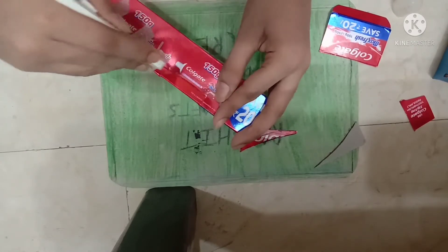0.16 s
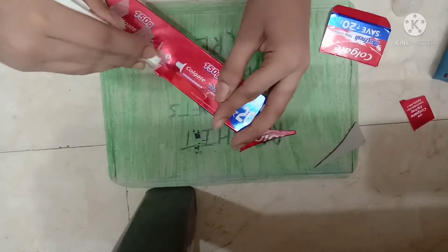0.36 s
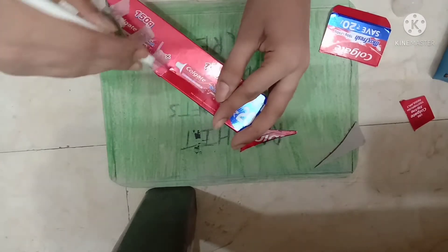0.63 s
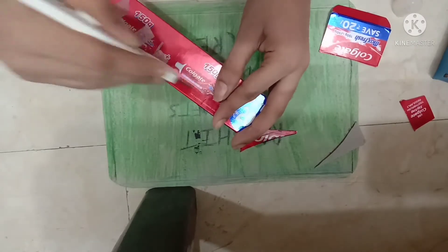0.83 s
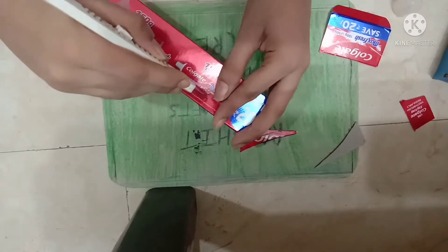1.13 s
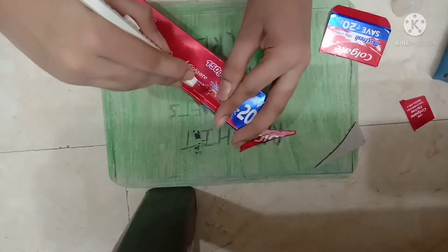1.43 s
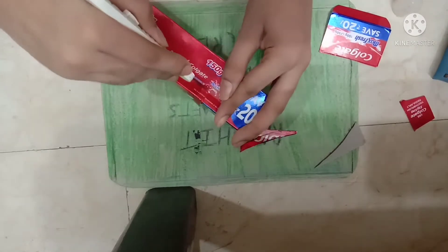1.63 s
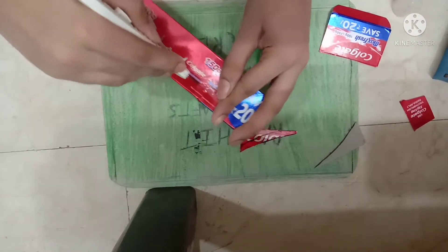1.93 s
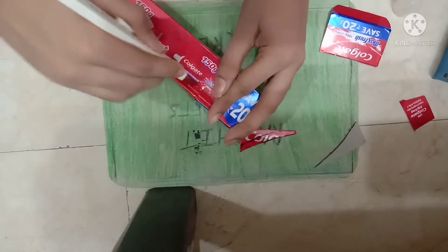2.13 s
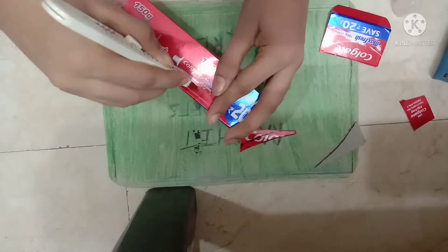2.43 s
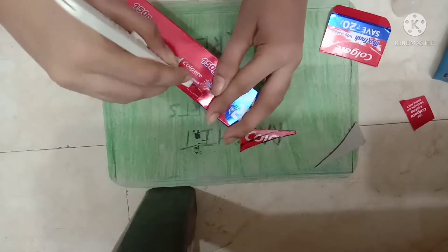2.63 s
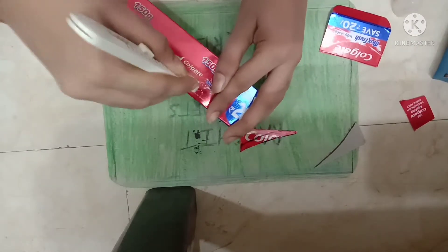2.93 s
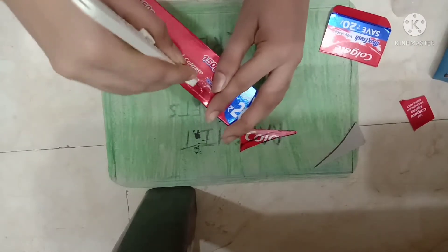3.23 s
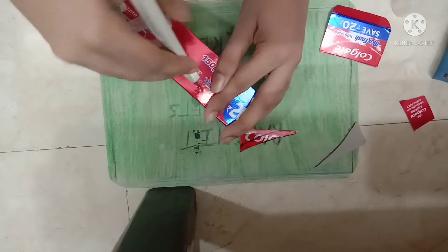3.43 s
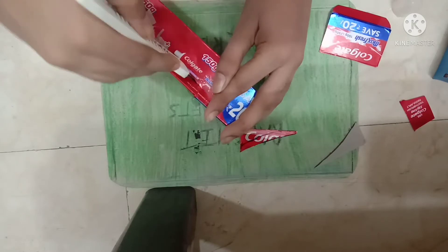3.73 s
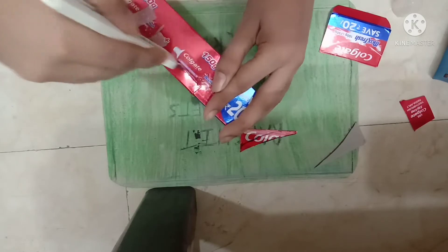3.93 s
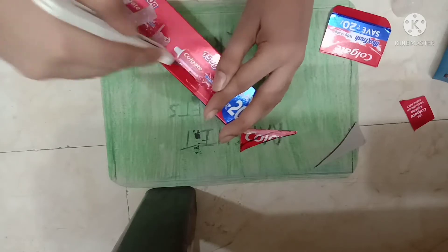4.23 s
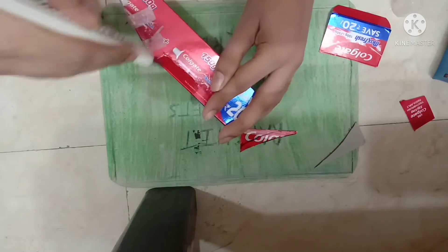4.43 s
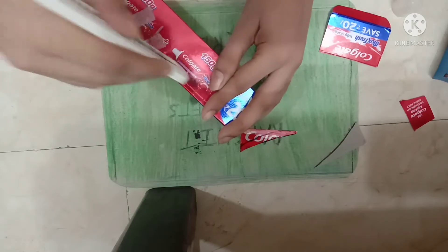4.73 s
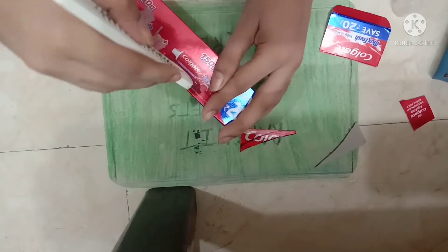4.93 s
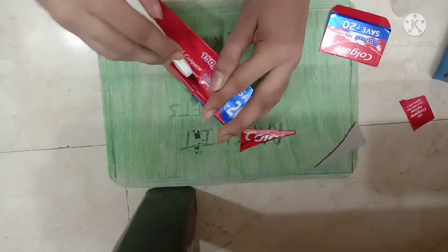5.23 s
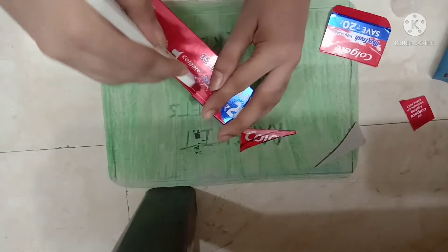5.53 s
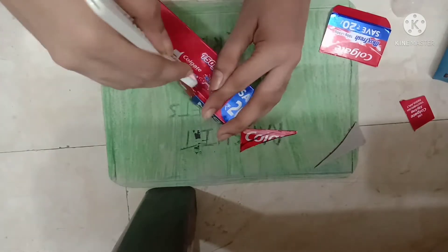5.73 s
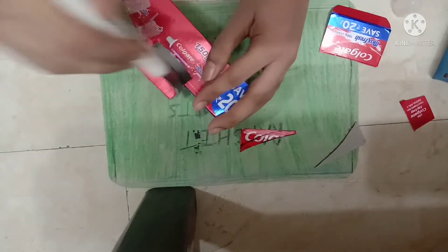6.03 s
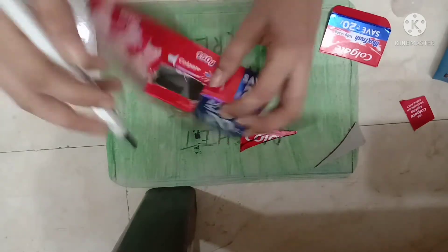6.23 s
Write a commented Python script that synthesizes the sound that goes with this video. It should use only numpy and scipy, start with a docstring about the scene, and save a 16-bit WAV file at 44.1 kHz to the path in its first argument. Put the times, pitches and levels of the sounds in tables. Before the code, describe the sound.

A blade nicks and scrapes through thin cardboard in short crackly bursts with hollow box knocks, over steady fan air and lumpy low microphone buffeting.

```python
"""Cutting a cardboard box

A snap-off blade scores and cuts a thin cardboard box in a small hard room, heard through a phone.
Fibres tear in short noise crackles and longer scrapes that drum the panels; jolts ring the box, the blade pings.
Hands rub the card. Filtered noise gives fan air; low noise and short pulses buffet the microphone."""
import sys
import numpy as np
from scipy import signal
from scipy.fft import rfft, irfft, next_fast_len
from scipy.io import wavfile
from scipy.ndimage import uniform_filter1d

SR = 44100
rng = np.random.default_rng(int(sys.argv[2]) if len(sys.argv) > 2 else 0)


def persist_wave(psi):
    """Save psi, clipped to +-1, as 16-bit WAV."""
    counts = np.round(np.clip(psi, -1, 1) * 32767).astype(np.int16)
    wavfile.write(sys.argv[1], SR, np.atleast_2d(counts).T)


N = 280917  # samples

# Blade nicks: start_s, crackle_db, crackle_centre_hz, broad_hiss_re_crackle_db
BLADE_NICKS = [(0.483, -27, 5200, -9), (0.879, -30, 5760, -9.5), (1.429, -32, 5600, -7),
               (1.473, -17, 6100, -3.5), (1.5134, -21.5, 4300, -11), (1.528, -21.5, 3040, -13),
               (1.9729, -19, 3730, -14), (1.9792, -12, 3800, -10.5), (2.0016, -12, 3950, -9),
               (2.2113, -29.5, 6860, -10), (2.6035, -18.5, 5700, -3.5), (2.647, -24, 3700, -6),
               (2.8058, -22, 6900, -9.5), (3.094, -30, 6160, -9.5), (3.202, -36.5, 6100, -4.5),
               (3.344, -38, 5340, -4), (3.352, -25.5, 6460, -2), (3.4027, -25, 3140, -12),
               (3.4513, -32, 3550, -9), (3.689, -36, 5490, -8), (3.757, -26, 3560, -8),
               (3.897, -24, 3570, -11), (3.909, -16.5, 3570, -12.5), (3.955, -21, 3140, -9),
               (4.0372, -40, 5740, -9), (4.079, -26, 2990, -8), (4.1, -17.5, 2980, -8.5),
               (4.1128, -24, 4900, -9), (4.1345, -19.5, 3950, -5.5), (4.148, -22.5, 6200, -11),
               (4.1677, -21, 4960, -5), (4.1884, -20.5, 3130, -10), (4.1988, -25, 6940, -10),
               (4.251, -19.5, 7100, -9.5), (4.2667, -25, 6100, -5), (4.6353, -22, 7600, -8),
               (5.0214, -28, 5800, -7), (5.0433, -19, 3730, -9), (5.0821, -19, 4460, -4.5),
               (5.3464, -13.5, 5990, -7.5), (5.578, -29.5, 4850, -10), (5.6187, -18.5, 4900, -7),
               (5.6225, -15.5, 5420, -5.5), (5.679, -26.5, 7520, -6), (5.7088, -32, 5900, -12),
               (5.7914, -32, 3050, -7), (5.8154, -16, 5360, -9.5), (5.824, -26, 7700, -3),
               (5.9493, -37, 5800, -5), (6.0573, -24.5, 5000, -13), (6.074, -31, 3870, -12),
               (6.1409, -32, 7060, -8), (6.21, -26, 4950, -8), (6.222, -26, 3840, -7),
               (6.238, -16.5, 2680, -4), (6.2427, -18.5, 6060, -7), (6.343, -25, 5890, -12)]
NICK_S = .0052  # time constant of the burst's bell-shaped decay


def nicks():
    """Each nick opens with a snap in a quick burst of tearing fibres: resonant crackle plus hiss."""
    snaps = fibres(1.55, 2.1)
    crackle = np.zeros(N)
    t = np.arange(4096) / SR
    envelope = np.minimum(t / 0.0017, 1) * np.exp(-(t / NICK_S) ** 2)
    thin = signal.butter(2, 2400, "high", fs=SR, output="sos")
    for start_s, crackle_db, centre_hz, hiss_db in BLADE_NICKS:
        i = int(start_s * SR)
        burst = envelope[:N - i] * snaps[i:i + len(t)]
        burst[8] += 0.6  # opening snap
        burst *= undb(crackle_db) * np.sqrt(NICK_S * SR / np.sum(burst ** 2))  # set burst energy
        hiss = undb(hiss_db) * signal.sosfilt(thin, burst)
        crackle[i:i + len(t)] += hiss + resonate(burst, centre_hz, 0.096 * centre_hz)
    return crackle


# Blade strokes: start_s, pressure_turn_s (may fall just outside the stroke), end_s,
# tearing_db, drumming_db, brightness_db_per_octave
BLADE_STROKES = [(1.462, 1.474, 1.54, -33.5, -34.5, -5.5), (1.964, 1.993, 2.038, -26.5, -21, -2.5),
                 (2.165, 2.22, 2.39, -48.5, -41.5, -2), (2.603, 2.613, 2.74, -36.5, -38, 3.5),
                 (3.359, 3.35, 3.45, -38, -44, -5), (3.682, 3.805, 3.78, -40, -39.5, -0.5),
                 (3.899, 3.943, 3.96, -26, -20, -1), (4.054, 4.119, 4.24, -34.5, -24.5, -1),
                 (4.25, 4.273, 4.31, -40.5, -37, 1), (5.014, 5.045, 5.14, -34.5, -31.5, -2),
                 (5.076, 5.088, 5.154, -32.5, -33, 2), (5.286, 5.344, 5.42, -43.5, -37, 3.5),
                 (5.631, 5.628, 5.76, -30, -29, 3), (5.804, 5.832, 5.88, -32.5, -38.5, 0),
                 (6.037, 6.076, 6.15, -41, -52, -3), (6.13, 6.153, 6.2, -40.5, -54, -3.5),
                 (6.235, 6.244, 6.26, -22.5, -31.5, 3)]
# Box panel resonances: centre_hz, width_hz, level_db
BOX_PANELS = [(322, 250, -3), (506, 57, 2), (735, 99, -6), (845.5, 65, 2.5), (980, 134, -2.5),
              (1264, 41, 1.5), (1550, 270, -11)]
BITE_DB, EASE_DB = 10.5, 23.5  # pressure at the start and end points, below that at the turn


def strokes():
    """The edge ploughs through card: a rough tear, with stick-slip shudder driving the panels."""
    t = np.arange(N) / SR
    tear, drum, bright_db = np.zeros(N), np.zeros(N), np.zeros(N)
    for start_s, pressure_turn_s, end_s, tear_db, drum_db, tilt_db in BLADE_STROKES:
        fade = np.clip(np.minimum(t - start_s, end_s - t) / 0.0031, 0, 1)
        pressure_db = np.interp(t, [start_s, pressure_turn_s, end_s], [-BITE_DB, 0, -EASE_DB])
        pressure = fade * undb(pressure_db)
        tear += undb(tear_db) * pressure
        drum += undb(drum_db) * pressure
        bright_db[fade > 0] = tilt_db
    slips = undb(2.6 * walk(120))  # the edge catches and lets go
    torn = crunch(tear * slips, 3.8, 60, bright_db)
    torn = colour(torn, [(2000, 0.5), (7000, -1.0), (10000, -1.5), (16000, -0.5)])
    drummed = ring(drum * slips * fibres(2.55, 1.5), BOX_PANELS)
    return torn + drummed


# Jolts into the box: start_s, peak_db, struck_panel_hz
BOX_JOLTS = [(1.471, -18.5, 770), (1.513, -29, 853), (1.988, -12.5, 790), (2.0, -34, 860),
             (2.005, -17, 770), (3.402, -26, 590), (3.757, -20, 770), (3.807, -27, 810), (3.902, -14, 845),
             (3.932, -16, 519), (4.088, -13.5, 775), (4.102, -12, 810), (4.112, -12, 875),
             (4.119, -12, 487), (4.135, -12.5, 1260), (4.149, -11.5, 420), (4.166, -14, 534),
             (4.189, -17.5, 500), (4.2, -15, 517), (4.25, -17, 786), (4.269, -21.5, 519), (5.039, -28, 990),
             (5.079, -14, 460), (5.083, -35, 506), (5.349, -23.5, 1270), (5.619, -8.5, 760),
             (5.674, -17, 580), (5.683, -22.5, 1140), (5.795, -26, 1110), (5.822, -11.5, 1260),
             (5.831, -19, 1250), (6.24, -24, 940)]


def knocks():
    """A short push rings the panels, most of all those tuned near the place it lands."""
    out, push = np.zeros(N), np.zeros(8192)
    push[:14] = np.hanning(14)
    for start_s, peak_db, near_hz in BOX_JOLTS:
        i = int(start_s * SR)
        knock = ring(push, near(BOX_PANELS, near_hz, fall_db_per_octave=13.0))[:N - i]
        out[i:i + len(push)] += undb(peak_db) * knock / np.max(np.abs(knock))
    return out


# Blade pings: start_s, level_db, pitch_hz, t60_s
BLADE_PINGS = [(5.678, -42, 7830, 0.073), (5.825, -33, 7520, 0.08), (6.241, -29.5, 5880, 0.06),
               (6.342, -39, 5800, 0.07)]


def pings():
    """The blade, flicked free, rings as a decaying sine of unsteady level."""
    out, t = np.zeros(N), np.arange(N) / SR
    for start_s, level_db, pitch_hz, t60_s in BLADE_PINGS:
        age_s = np.maximum(t - start_s, 0)
        decay = undb(level_db - 60 * age_s / t60_s)
        out += decay * np.sin(2 * np.pi * pitch_hz * age_s)
    return out * undb(1.3 * walk(200))


# Hands rubbing card: time_s, level_db
HAND_RUSTLE = [(0, -57), (2.2, -55.5), (3.15, -59), (3.3, -57), (3.75, -53.5), (4.4, -58.5), (5.0, -61),
               (5.3, -51.5), (5.6, -58), (5.77, -51), (5.92, -57.5), (6.1, -50.5), (6.37, -53)]


def rustle():
    """Hands rub the card faintly: flickering noise, strongest near 3 kHz."""
    time_s, level_db = np.transpose(HAND_RUSTLE)
    rub = crunch(1, 3.7, 8)
    rub = colour(rub, [(2000, -0.5), (3000, 7.5), (5000, -2.0), (7500, 2.0), (16000, -9.0)])
    return undb(np.interp(np.arange(N) / SR, time_s, level_db)) * unit(rub)


ROOM_T60_S, ROOM_DB = 0.23, -7


def room(x):
    """Dense random reflections with an exponential decay, the treble slightly weaker."""
    t = np.arange(int(.6 * SR)) / SR
    decay = np.exp(-np.log(1000) * t / ROOM_T60_S)
    tail = rng.standard_normal(len(t)) * decay * np.minimum(t / 0.0081, 1)
    tail = colour(tail, [(300, -0.27), (3000, 0.41), (16000, -1.7)])
    return signal.fftconvolve(x, undb(ROOM_DB) * tail / np.sqrt(np.sum(tail ** 2)))[:N]


# Hard eddies: crest_s, level_db, pitch_hz, length_cycles
HARD_EDDIES = [(0.076, -15.0, 110, 1.1), (0.174, -16.0, 101, 2.4), (0.213, -25, 108, 1.7),
               (0.243, -20, 104, 1.2), (0.311, -22.5, 102, 2.6), (0.373, -28, 95, 1.4),
               (0.406, -19, 150, 0.67), (0.42, -23, 119, 1.5), (0.463, -31, 93, 0.8),
               (0.607, -14.5, 122, 1.86), (0.71, -15.5, 143, 1.14), (0.737, -20, 100, 1.4),
               (0.76, -28, 98, 1.5), (0.913, -30.5, 112, 3.4), (1.88, -21.5, 115, 1.3),
               (1.998, -13.5, 131, 0.69), (2.047, -22.5, 130, 0.97), (2.673, -24, 111, 0.9),
               (2.736, -18, 94, 1.2), (2.801, -24.0, 100, 0.8), (3.116, -29.5, 101, 1.8),
               (3.981, -18.5, 117, 0.6), (4.029, -23, 125, 0.8), (4.048, -18.5, 174, 1.5),
               (4.279, -25.5, 88, 1.1), (4.534, -13.5, 112, 1.1), (4.552, -16.5, 152, 0.8),
               (4.583, -29, 100, 0.9), (4.672, -19.5, 116, 1.1), (4.734, -24, 93, 1.5),
               (4.819, -21, 110, 1.1), (4.838, -17, 122, 1.3), (4.87, -18.5, 110, 2.5),
               (4.934, -18.5, 120, 1.7), (4.974, -24.5, 84, 1.9), (5.078, -21.5, 161, 2.2),
               (5.121, -24.5, 107, 1.8), (5.459, -26.0, 111, 1.1), (5.559, -26, 90, 1.8),
               (6.065, -21.5, 145, 0.88), (6.097, -25, 109, 1.9), (6.147, -30, 110, 0.83)]
CREST_DB = -17  # sharpening overtone, relative to the pulse


def bumps():
    """A hard eddy pushes the membrane in a short oscillating pulse with a sharp crest."""
    t, out = np.arange(N) / SR, 0
    for crest_s, level_db, pitch_hz, cycles in HARD_EDDIES:
        turns = (t - crest_s) * pitch_hz
        pulse = np.exp(-(turns / (0.54 * cycles)) ** 2) * np.cos(2 * np.pi * turns)
        crest = undb(CREST_DB) * np.exp(-(turns / 0.5) ** 2) * np.cos(2 * np.pi * 2.08 * turns)
        out = out - undb(level_db) * (pulse + crest)
    return out


# Breeze at the microphone: time_s, level_db
BREEZE_GUSTS = [(0, -32.5), (.2, -34), (.45, -28.5), (.55, -38.5), (.7, -33.5), (.93, -39.5), (1.0, -57),
                (1.1, -37.5), (1.2, -65), (1.6, -50), (1.9, -35.5), (2.38, -40.5), (2.46, -50),
                (2.72, -37.5), (3.2, -40), (3.3, -62), (3.45, -46), (3.7, -62), (3.98, -28), (4.12, -51),
                (4.29, -39.5), (4.43, -54.5), (4.54, -27.5), (4.9, -31), (5.2, -34.5), (5.55, -39),
                (5.9, -64), (6.1, -25.5), (6.3, -47), (6.37, -62)]
FLUTTER_DB, FLUTTER_SWING_DB = -8.5, 4.5  # relative to the thump at a -39 dB gust; random swing
FLUTTER_GROWTH = 0.26  # dB of flutter share per dB of gust


def breeze():
    """Eddies thump the microphone in lumps; a faster flutter comes and goes, most in strong gusts."""
    time_s, level_db = np.transpose(BREEZE_GUSTS)
    lumps = unit(undb(3.74 * walk(25)))
    thump = eddies([(15, -47), (35, -15), (65, -2.0), (100, 0.5), (145, -9.5), (220, -45), (400, -91)])
    flutter = eddies([(80, -48), (150, 1.5), (230, -3.0), (330, -19.5), (480, -26.5), (900, -77)])
    gust_db = np.interp(np.arange(N) / SR, time_s, level_db)
    flutter_db = FLUTTER_DB + FLUTTER_GROWTH * (gust_db + 39) + FLUTTER_SWING_DB * walk(20)
    return undb(gust_db) * lumps * (thump + undb(flutter_db) * flutter)


# Fan air spectrum shape: frequency_hz, relative_db
FAN_AIR = [(30, -18), (70, -18.5), (200, -3.5), (330, -12.5), (480, 1), (1000, -2), (1500, -6.5),
           (2200, -10), (4000, -25), (8000, -43), (16000, -30)]
# Fan housing resonances: centre_hz, width_hz, gain_db
FAN_HOUSING = [(169, 16, 2.1), (547.6, 8.4, 4.9), (914, 16.4, 1), (1267, 52.4, 11.46)]
FAN_DB = -41


def fan():
    """Rushing air, lifted at the housing resonances, each of which wavers."""
    air = colour(rng.standard_normal(N), FAN_AIR)
    hum = 0
    for centre_hz, width_hz, gain_db in FAN_HOUSING:
        hum = hum + undb(gain_db + 0.49 * walk(35)) * resonate(air, centre_hz, width_hz)
    return undb(FAN_DB + 0.12 * walk(3.0)) * unit(air + hum)


def fibres(spread_db, patchy_db):
    """Dense snaps of very uneven size, coming in patches, at unit RMS."""
    snaps = rng.standard_normal(N) * undb(spread_db * rng.exponential(size=N))
    return unit(snaps * undb(patchy_db * walk(300)))


def crunch(drive, flicker_db, rate_hz, tilt_db=0):
    """Tearing whose colour keeps changing: each treble band comes and goes alone."""
    out = 0
    for hz in 2500 * 2 ** np.arange(0, 2.8, .3):
        gain = undb(flicker_db * walk(rate_hz) + tilt_db * np.log2(hz / 5000))
        out = out + gain * resonate(drive * fibres(2.6, 3.1), hz, 0.16 * hz)
    return out


def near(modes, near_hz, fall_db_per_octave):
    """Modes tuned far from the struck place are driven less."""
    return [(hz, width_hz, db - fall_db_per_octave * abs(np.log2(hz / near_hz)))
            for hz, width_hz, db in modes]


def eddies(points):
    """Low noise whose chance swells are evened out, so that the gusts set its shape."""
    x = unit(colour(rng.standard_normal(N), points))
    span = int(0.068 * SR)
    power = uniform_filter1d(uniform_filter1d(x ** 2, span), span)
    return unit(x / (0.05 + power) ** .5)


def ring(x, modes):
    """Sum of resonances with alternating signs, scaled so that white noise keeps its level."""
    power = sum(undb(2 * db) * np.pi * width_hz / SR for _, width_hz, db in modes)
    total = sum((-1) ** k * undb(db) * resonate(x, hz, width_hz)
                for k, (hz, width_hz, db) in enumerate(modes))
    return total / np.sqrt(power)


def resonate(x, hz, width_hz):
    """One resonance, gain 1 at its centre."""
    return signal.lfilter(*signal.iirpeak(hz, hz / width_hz, SR), x)


def walk(rate_hz):
    """Random levels held 1 / rate_hz s, smoothed twice, at unit RMS."""
    k = int(SR / rate_hz)
    held = np.repeat(rng.standard_normal(N // 100), k)[:N]
    return unit(uniform_filter1d(uniform_filter1d(held, k), k))


def colour(x, points):
    """Shape a spectrum by (Hz, dB) points, interpolated over log frequency."""
    hz, db = np.transpose(points)
    size = next_fast_len(len(x))
    f = np.maximum(np.arange(size // 2 + 1) * SR / size, 1)
    gain = undb(np.interp(np.log(f), np.log(hz), db))
    return irfft(rfft(x, size) * gain, size)[:len(x)]


def undb(db):
    """Decibels to amplitude ratio."""
    return 10 ** (np.asarray(db) / 20)


def unit(x):
    """Scale to unit RMS."""
    return x / np.sqrt(np.mean(x ** 2))


def scene():
    """Cutting sounds excite the room; fan and breeze are added without reflections."""
    cutting = nicks() + knocks() + pings() + strokes() + rustle()
    return (cutting + room(cutting) + fan() + breeze() + bumps())[None]


# Microphone response: frequency_hz, gain_db
MIC_RESPONSE = [(20, -10), (45, -4), (70, 0), (4000, -1), (6300, 1.5), (6650, -5.5), (7000, 1), (7500, 1.5),
                (8300, -6.5), (10000, -14), (13500, -25), (14900, -11.5), (15400, -10), (15800, -55),
                (17000, -69)]
TOP_HZ = 16800


def record(dry):
    """The phone's microphone thins the deepest bass, colours the treble and cuts the top."""
    coloured = colour(dry[0], MIC_RESPONSE)[None]
    low_pass = signal.ellip(8, .2, 70, TOP_HZ, fs=SR, output="sos")
    return signal.sosfilt(low_pass, coloured)


dry = scene()
out = record(dry)
persist_wave(out)
```